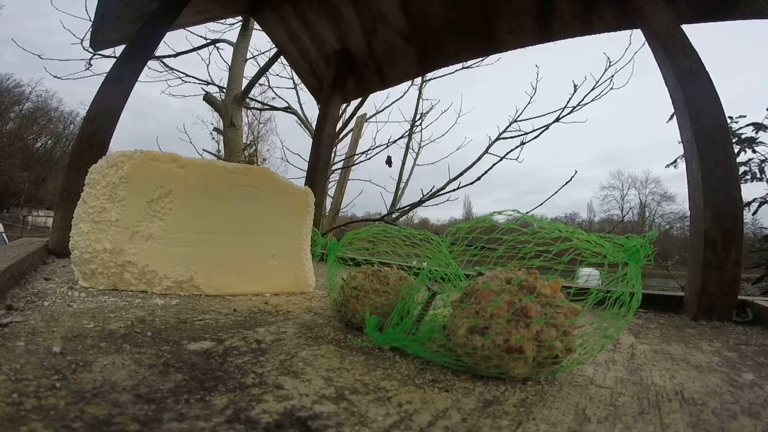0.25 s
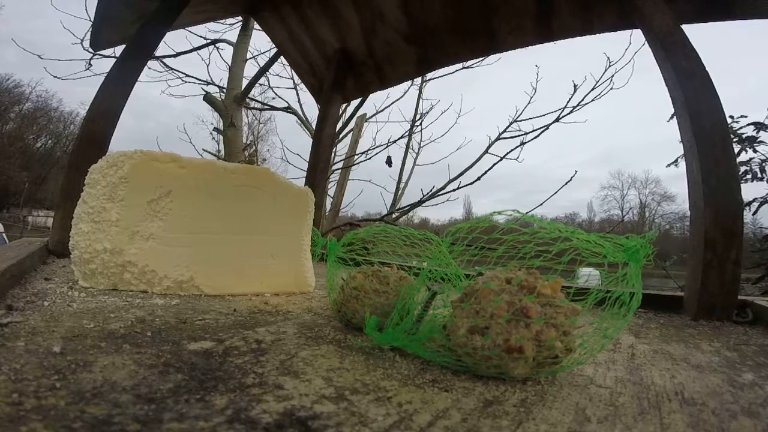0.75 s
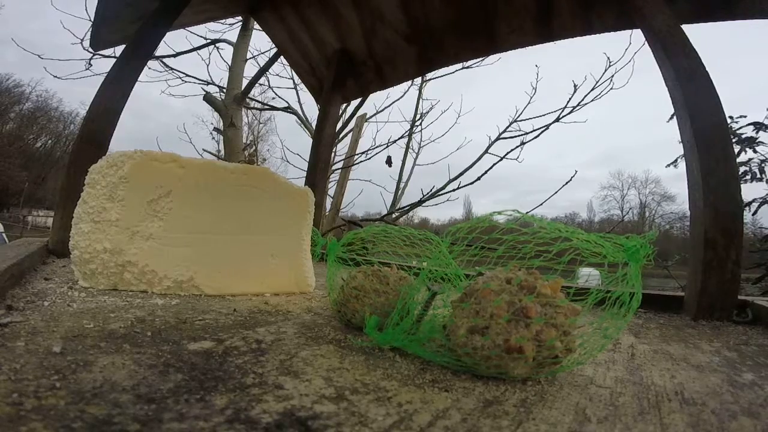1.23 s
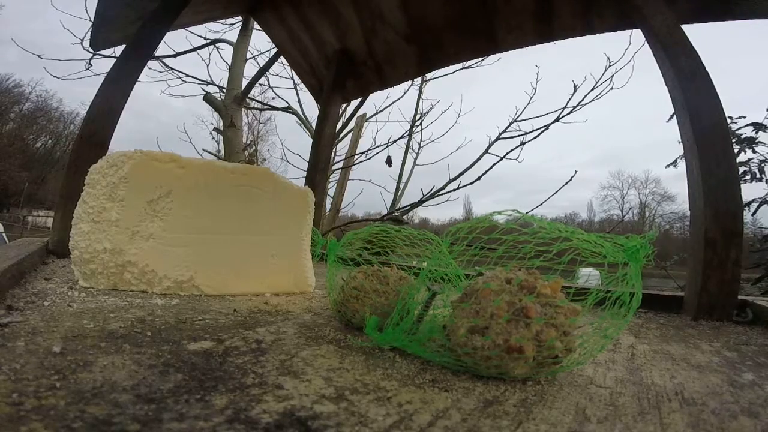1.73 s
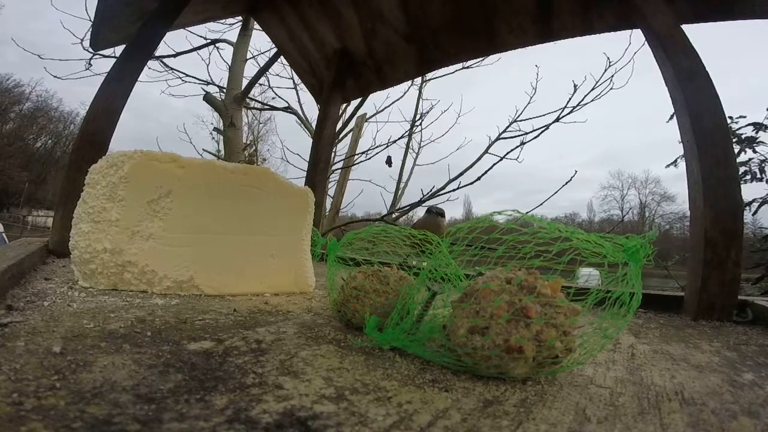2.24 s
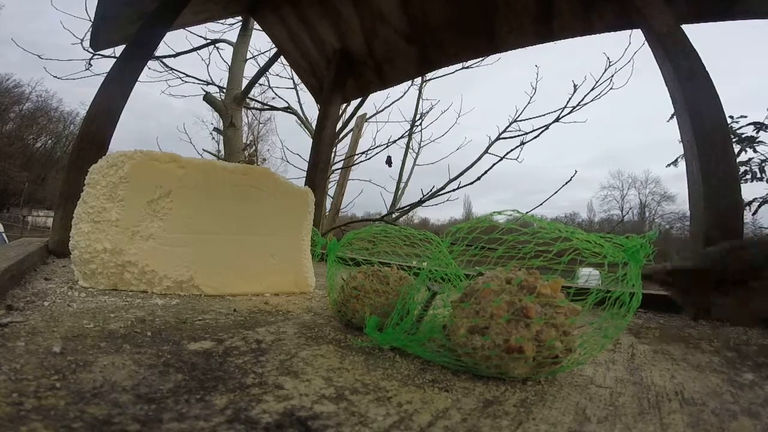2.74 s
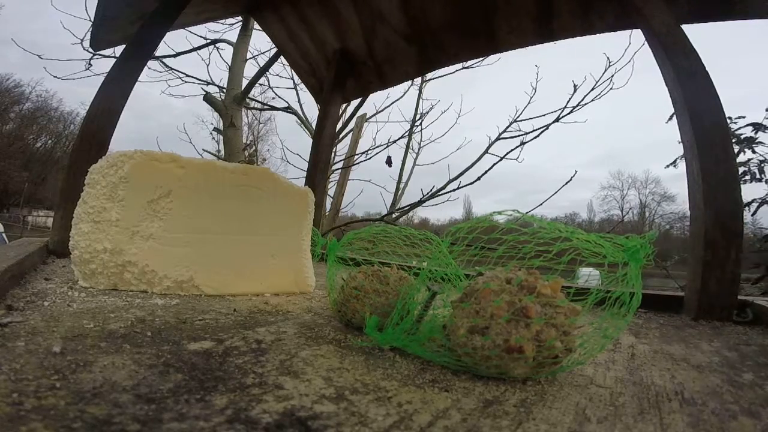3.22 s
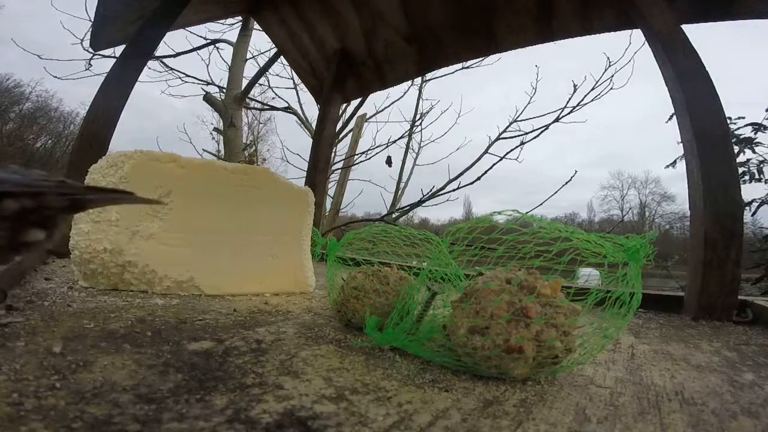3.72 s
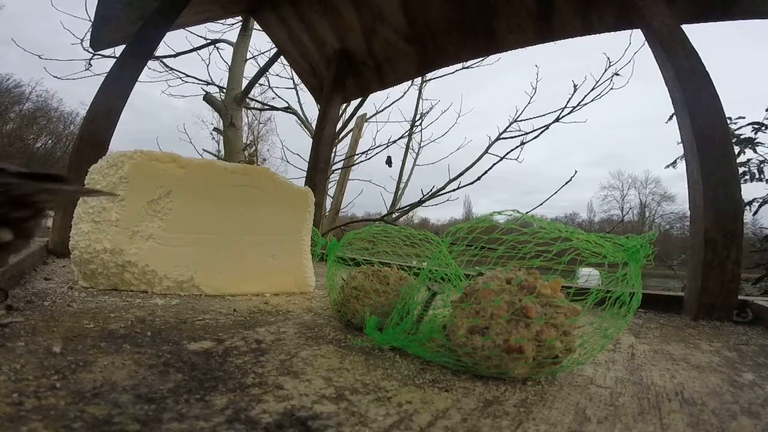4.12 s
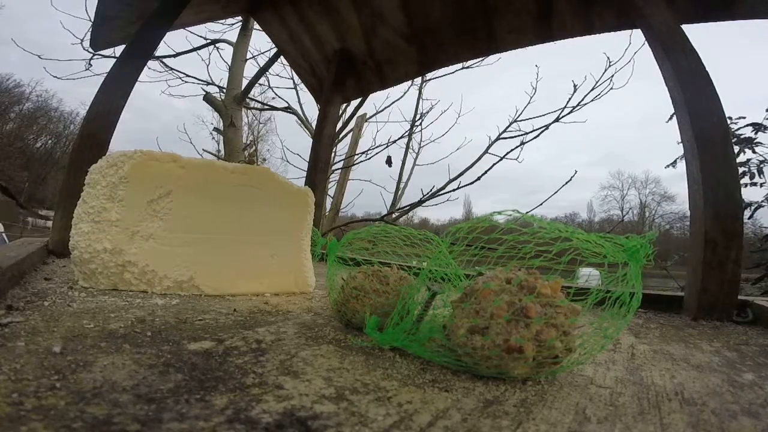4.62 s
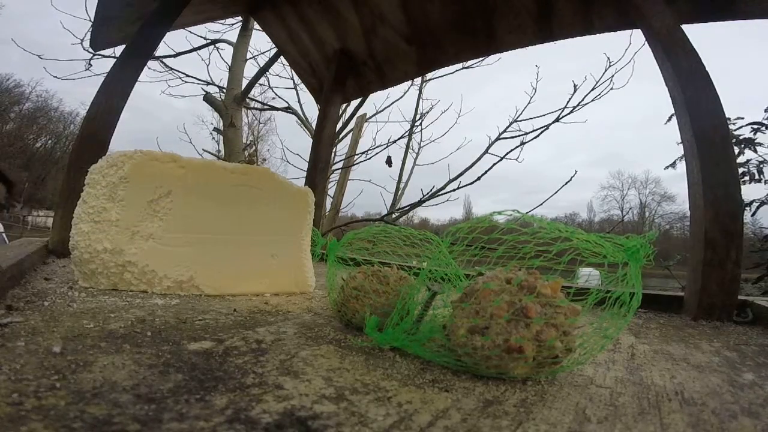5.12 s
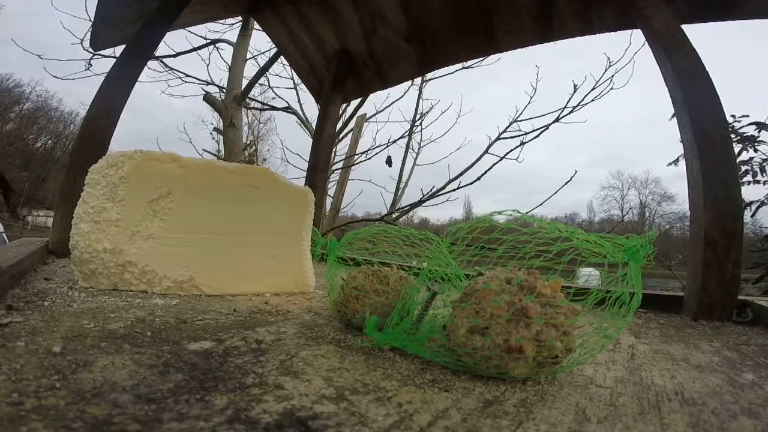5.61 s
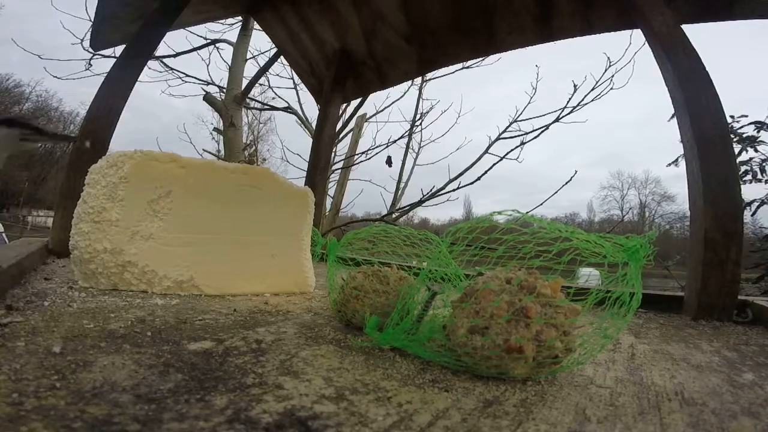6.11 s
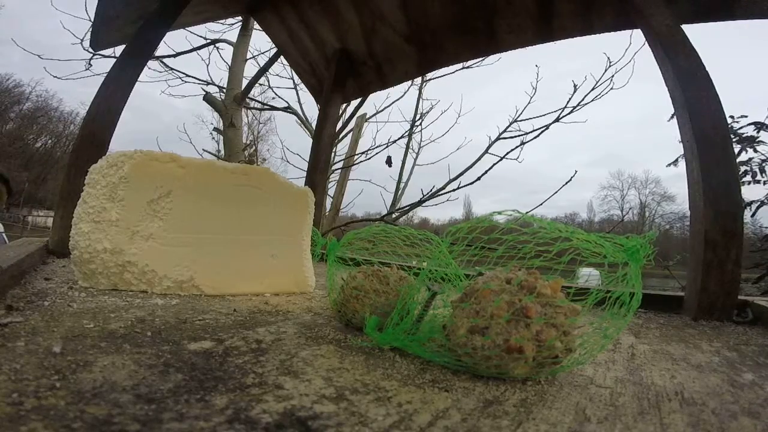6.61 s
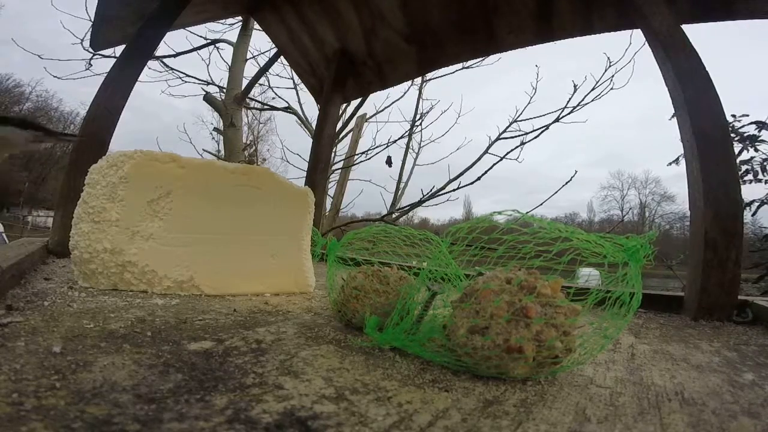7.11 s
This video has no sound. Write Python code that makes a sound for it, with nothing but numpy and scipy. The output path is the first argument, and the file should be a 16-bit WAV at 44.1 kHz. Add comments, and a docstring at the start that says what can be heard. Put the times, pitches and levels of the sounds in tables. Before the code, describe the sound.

Irregular claw taps and faint scrapes on a wooden board, two thin chirps early on, then sharp double-knock pecks in a quiet garden.

```python
"""A quiet garden with a roofed wooden feeder table, on which a bird lands, hops across and pecks hard four times.
A camera stands on the same board, so each blow of claw or beak excites damped modes: a dry knock of the board,
woody overtones and a short rattle of the case. Dragged claws scuff by irregular catches.
The table rocks in slow modes and its post trembles as deep noise after each push.
Two thin chirps are gliding tones; the garden behind is faint coloured noise."""
import sys
import numpy as np
from scipy import signal
from scipy.fft import rfft, irfft, next_fast_len
from scipy.io import wavfile
from scipy.ndimage import map_coordinates

SR = 44100
rng = np.random.default_rng(int(sys.argv[2]) if len(sys.argv) > 2 else 0)


def master_out(mix):
    """Clip the mix to full scale and print it as 16-bit PCM to the path in sys.argv[1]."""
    frames = np.transpose(np.atleast_2d(mix))
    ceiling = np.clip(frames, -1, 1)
    pcm = np.round(ceiling * 32767).astype(np.int16)
    wavfile.write(sys.argv[1], SR, pcm)


N = 324135  # length of the scene [samples]
T = np.arange(SR // 2) / SR  # time within one blow [s]

# Blows of the beak: t/s, knock level/dB, wood level/dB, rattle level/dB, click level/dB,
# rebound delay/s, rebound level/dB (relative to the bite), post tremble level/dB
PECKS = [(4.895, -24.5, -36, -27.5, -35, .017, -43, -45.5),
         (5.8372, -14.5, -30, -34, -61, 0.017, -5.5, -44.5), (6.0365, -9, -21.5, -24, -37, .02, -8.5, -46),
         (6.877, -9, -20.5, -22.5, -34, .0212, -6.5, -45.5)]
# Claws striking the board: t/s, rattle level/dB, knock level/dB, wood level/dB
STEPS = [(0.7114, -31.5, -33.5, -27.5), (0.7241, -30, -37.5, -23), (0.7348, -39, -37.5, -35),
         (0.7506, -43, -50, -55), (0.7623, -42, -42.5, -44), (1.5654, -29, -47, -34.5),
         (1.6192, -28.5, -43.5, -40), (1.6298, -37, -39, -46), (1.9923, -44, -56, -44),
         (2.0332, -44, -46, -45), (2.0826, -34.5, -48.5, -41), (2.0898, -36, -63, -40.5),
         (2.115, -39, -51.5, -53), (2.654, -39, -36, -33), (2.7393, -44, -63, -58),
         (2.763, -41.5, -52, -43.5), (2.8652, -30, -37, -32), (2.9146, -39, -44.5, -47),
         (3.2357, -56, -42.5, -46), (3.2906, -35.5, -42, -32.5), (3.3099, -29.5, -65, -40.5),
         (3.5057, -23, -28, -23.5), (3.5487, -40.5, -50, -54), (3.5979, -34, -37, -34),
         (3.6205, -40, -32.5, -31), (3.6332, -39, -42, -56), (3.654, -38.5, -46, -46),
         (3.93, -44.5, -60, -45), (4.4199, -35.5, -37, -44), (4.4258, -41, -42, -32),
         (4.4381, -41, -45, -52), (4.4555, -40, -50, -38), (4.5151, -36, -34, -38), (4.529, -41, -46, -39),
         (4.8459, -50, -46, -43), (5.791, -47.5, -57, -52), (5.8294, -43.5, -60, -45.5),
         (5.9903, -42.5, -57, -51.5), (6.316, -47.5, -77, -62), (6.97, -46, -45.5, -51)]
# The bird's weight on a new spot: t/s, post tremble level/dB, board note favoured there f/Hz
HOPS = [(.72, -40.5, 427), (1.6, -50, 410), (2.07, -52.5, 388), (2.64, -52, 370), (2.86, -45, 353),
        (3.27, -58, 347), (3.5, -51, 265), (3.6, -58, 385), (4.41, -54, 413), (4.51, -50, 251)]
# Claws dragging over the wood: t/s, duration/s, level/dB
SCUFFS = [(.72, .04, -60), (0.762, 0.025, -48.5), (1.52, 0.012, -54.5), (1.633, 0.03, -56.5),
          (1.971, 0.11, -63.5), (2.541, 0.094, -58.5), (2.641, 0.048, -55.5), (2.705, 0.076, -59.5),
          (2.867, 0.09, -62), (3.056, .018, -57.5), (3.206, 0.061, -62), (3.338, .12, -62),
          (3.631, 0.046, -51), (3.925, 0.023, -60.5), (4.345, 0.049, -61.5), (4.468, 0.033, -60.5),
          (4.857, 0.029, -57), (6.168, 0.15, -72)]
# Modes of the table with the camera on it: f/Hz, relative level/dB, t60/s (before extra damping)
TABLE_MODES = [(222.1, -10, 0.19), (308.7, 5.5, 0.069), (372.8, 1, 0.071), (421, -9, 0.089),
               (524, -11, 0.032), (584, -21, 0.098), (922.7, 3, 0.093), (1088, -18, 0.067),
               (1098, -5.5, 0.075), (1283, 1, 0.056), (1688, 3, 0.033), (1850, -16, 0.0055),
               (2170, 3.5, 0.0066), (2444, 1, 0.024), (2567, 14, 0.011), (2710, 4, 0.022),
               (3100, -33, 0.04), (3100, -32, 0.022), (4070, -23, 0.033)]
# Spectrum of the timber's crowded weak overtones: f/Hz, relative level/dB
GRAIN_SPECTRUM = [(300, 2.5), (480, 15), (660, 6.5), (790, -24.5), (1000, 10.5), (1800, 1), (2800, -3.5),
                  (3300, -11.5), (4500, -33.5), (7000, -57.5)]
# Spectrum of the case's crowded weak overtones: f/Hz, relative level/dB
CASE_SPECTRUM = [(1500, -44), (2200, 6.5), (2900, 10.5), (3400, -11.5), (4200, -2.5), (5000, -26.5),
                 (8000, -41.5)]
# Spectrum of a hard tip's snap: f/Hz, relative level/dB
CLICK_SPECTRUM = [(1500, -69), (3500, 13), (4800, 0), (6300, 3), (8500, -2), (12000, -16), (16000, -13.5)]
# Slow modes of the table on its post: f/Hz, relative level/dB, t60/s
ROCKING_MODES = [(34.1, -7, 0.84), (50.6, 0.5, 0.55), (71.6, 7, 0.25), (107, 2, 0.16)]
# Spectrum of the post's tremble: f/Hz, relative level/dB
POST_SPECTRUM = [(10, -40), (22, 0), (33, 3), (48, -21), (60, -7), (74, -9), (95, -18.5), (150, -20.5),
                 (230, -30.5), (450, -84.5)]
# Starts of the two chirps: t/s, level/dB
CHIRPS = [(.221, -57), (0.637, -47.5)]
# Course of one chirp: t/s from its start, f/Hz, relative level/dB
CHIRP_COURSE = [(0, 5700, -22), (.005, 6600, -15), (.010, 7800, -6.5), (.015, 8400, -22), (.02, 8400, -17),
                (.027, 7700, -45)]
# Spectrum of the garden air: f/Hz, relative level/dB
GARDEN_SPECTRUM = [(18, -21), (30, 4), (81, -2), (113, -1.5), (143, -5.5), (200, -2), (216, -4), (312, -5),
                   (364, -5.5), (662, -10), (1000, -12), (1410, -13.5), (2990, -18), (3680, -19),
                   (15000, -36.5)]

BITE_S = 0.0035  # from the beak's first touch until its tip bites
TOUCH_LEAD_S, TOUCH_DB, TOUCH_CLICK_DB = 0.0035, -8.5, -4.5  # a claw's graze before the foot comes down
CLICK_DB, CLICK_GROWS = -10.5, 1.124  # claw snap: dB offset; dB per dB of mean rattle and wood level
RATTLE_HZ, RATTLE_SPREAD_HZ, RATTLE_SCATTER_HZ = 2550, 850, 200  # centre, half width, +- change per step
TREMBLE_RISE_S, TREMBLE_FALL_DB_PER_S = 0.004, 24.5  # the post after a push
FIDGET_DB = -60.5  # steady tremble from the first hop onward
GARDEN_DB = -59.5
TOP_HZ = 15050  # upper band limit of the camera


def pecks(buzz_fade_s=0.014):
    """Impact and rebound: the beak thumps the board; the case rattles at touch, bite and rebound."""
    out = np.zeros(N)
    for s, knock_db, wood_db, rattle_db, click_db, rebound_s, rebound_db, _ in PECKS:
        knock, _, _ = table(spot_db=1.3, damping=0.83, centre_hz=329, focus_db=21.5)
        add(out, s, amp(knock_db) * crest(knock))
        for delay, db in [(0, -7), (BITE_S, 0), (rebound_s, rebound_db)]:
            _, wood, rattle = table(spot_db=1.5, damping=0.57, centre_hz=330, grain_db=4.0)
            buzz = amp(wood_db) * crest(wood)
            buzz = buzz + amp(rattle_db) * gritty(rattle, grit=0.008, slip_s=0.00058)
            add(out, s + delay, amp(db) * buzz * np.exp(-T / buzz_fade_s))
        for delay, db in [(BITE_S, 0), (rebound_s, rebound_db / 2)]:
            snap = band(click(t60=0.0086), 2500, 7500)
            snap = band(snap, 2500, 7500)  # twice, for steeper skirts
            add(out, s + delay, amp(click_db + db) * snap)
    return out


def steps():
    """Contact sharpness: claws graze, then knock the board and buzz the case; sharper blows snap more."""
    out = np.zeros(N)
    hop_s, _, board_hz = np.transpose(HOPS)
    for s, rattle_db, knock_db, wood_db in STEPS:
        nearest_hop = np.argmin(np.abs(hop_s - s))
        knock, wood, rattle = table(spot_db=1.5, damping=0.85, centre_hz=board_hz[nearest_hop],
                                    focus_db=40, grain_db=3.0, grain_t60=0.033,
                                    buzz_t60=0.014, low_hz=179)
        rattle_hz = RATTLE_HZ + RATTLE_SCATTER_HZ * rng.uniform(-1, 1)
        rattle = band(rattle, rattle_hz - RATTLE_SPREAD_HZ, rattle_hz + RATTLE_SPREAD_HZ)
        # the foot comes down
        add(out, s, amp(knock_db) * gritty(knock, grit=0.052, slip_s=0.0064))
        add(out, s, amp(wood_db) * gritty(wood, grit=0.018, slip_s=0.0041))
        add(out, s, amp(rattle_db) * gritty(rattle, grit=0.055, slip_s=0.0019))
        sharp_db = (rattle_db + wood_db) / 2
        snap_db = CLICK_DB + CLICK_GROWS * sharp_db
        add(out, s, amp(snap_db) * click(t60=0.012))
        # the graze just before it
        touch_s = s - TOUCH_LEAD_S
        touch_db = TOUCH_DB + (sharp_db + knock_db) / 2
        add(out, touch_s, amp(touch_db) * gritty(wood + rattle, grit=0.18, slip_s=0.0037))
        add(out, touch_s, amp(TOUCH_CLICK_DB + snap_db) * click(t60=0.0087))
    return out


def table(spot_db, damping, centre_hz, focus_db=14, grain_db=0, grain_t60=0.047,
          buzz_db=-7, buzz_t60=0.022, low_hz=215, high_hz=900):
    """Modal superposition: one blow's board knock, woody overtones and case rattle."""
    hz, db, t60 = np.transpose(TABLE_MODES)
    register = np.digitize(hz, [750, 2000])  # 0 knock, 1 wood, 2 rattle
    # each blow weights the modes anew
    weight = amp(db + spot_db * rng.standard_normal(len(hz)))
    # the spot favours board modes near its centre
    octaves_away = np.minimum(np.abs(np.log2(hz / centre_hz)), 0.5)
    # neighbours swing in opposite senses, so the knock swells
    board = amp(-focus_db * octaves_away) * (-1) ** np.arange(len(hz))
    modes = ringing(hz, weight * np.where(register == 0, board, 1), t60 / damping)
    knock, wood, rattle = [unit(modes[register == k].sum(axis=0)) for k in range(3)]
    # a small board radiates little bass
    knock = unit(band(knock, low_hz, high_hz))
    # overtones too crowded to tell apart die away like noise
    grain = noise(GRAIN_SPECTRUM, size=len(T)) * amp(-60 * damping * T / grain_t60)
    wood = wood + amp(grain_db) * unit(grain)
    buzz = noise(CASE_SPECTRUM, size=len(T)) * amp(-60 * damping * T / buzz_t60)
    rattle = rattle + amp(buzz_db) * unit(buzz)
    rise = swell(0.0004)
    return knock, rise * wood, rise * rattle


def ringing(hz, weight, t60):
    """Free vibration: one exponentially damped sine per mode."""
    decay = amp(-60 * T / t60[:, None])
    return weight[:, None] * decay * np.sin(2 * np.pi * hz[:, None] * T)


def gritty(ring, grit, slip_s):
    """Stick-slip excitation: a ring of peak 1 driven by a first touch and the tiny catches after it."""
    t = T[:SR // 20]
    force = grit * rng.standard_normal(len(t)) ** 3 * np.exp(-t / slip_s)
    force[0] += 1
    return crest(signal.fftconvolve(ring, force)[:len(T)])


def click(t60):
    """Hard contact: a short broadband burst of peak 1, the bright snap of a tip."""
    return crest(noise(CLICK_SPECTRUM, size=len(T)) * amp(-60 * T / t60) * swell(0.001))


def swell(rise_s):
    """Finite contact time: the response takes a moment to build up from 0 to 1."""
    return 1 - np.exp(-(T / rise_s) ** 2)


def rocking(peck_db=-21, step_db=-14):
    """Low-order modes: every peck and footfall sets the whole table rocking; dB relative to the knock."""
    out = np.zeros(N)
    hz, db, t60 = np.transpose(ROCKING_MODES)
    pushes = [(s, knock_db + peck_db) for s, knock_db, *_ in PECKS]
    pushes += [(s, knock_db + step_db) for s, _, knock_db, _ in STEPS]
    for s, push_db in pushes:
        weight = amp(db + 0.71 * rng.standard_normal(len(hz))) * (-1) ** np.arange(len(hz))
        rock = swell(0.0054) * ringing(hz, weight, t60).sum(axis=0)
        add(out, s, amp(push_db) * crest(rock))
    return out


def scuffs(wood_db=1, knock_db=-8):
    """Friction: dragged claws catch on the grain at random, each catch ringing the table."""
    out = np.zeros(N)
    for s, length_s, db in SCUFFS:
        n = max(int(length_s * SR), 64)
        # some 600 catches a second on average
        catches = (rng.random(len(T)) < 600 / SR) * rng.standard_normal(len(T))
        knock, wood, rattle = table(spot_db=2.5, damping=0.95, centre_hz=400)
        ring = rattle + amp(wood_db) * unit(wood) + amp(knock_db) * knock
        scrape = signal.fftconvolve(catches[:n] * signal.windows.tukey(n), ring)
        add(out, s, amp(db) * scrape / (np.std(scrape[:n]) + 1e-9))
    return out


def sway(lumps_db=1.5):
    """Addition of powers: each push leaves a lumpy, dying rumble in the post; fidgeting keeps it alive."""
    t = np.arange(N) / SR
    pushes = [(s, db) for s, db, _ in HOPS] + [(s, db) for s, *_, db in PECKS]
    power = amp(FIDGET_DB) ** 2 * (t > HOPS[0][0])
    for s, db in pushes:
        age = np.maximum(t - s, 0)
        rise = 1 - np.exp(-age / TREMBLE_RISE_S)
        power = power + (amp(db - TREMBLE_FALL_DB_PER_S * age) * rise) ** 2
    lumps = amp(lumps_db * wobble(rate=14))
    return np.sqrt(power) * unit(lumps * noise(POST_SPECTRUM, size=N))


def chirps():
    """Frequency modulation: a small bird in the trees gives two thin, mostly rising notes."""
    out = np.zeros(N)
    s, hz, db = np.transpose(CHIRP_COURSE)
    t = T[T < s[-1]]
    phase = 2 * np.pi * np.cumsum(np.interp(t, s, hz)) / SR
    note = amp(np.interp(t, s, db)) * np.sin(phase)
    for start, level_db in CHIRPS:
        add(out, start, amp(level_db) * note)
    return out


def garden():
    """Stationary noise: faint outdoor air and hiss, drifting only slightly in level."""
    drift_db = 0.5 * wobble(rate=1.5)
    return amp(GARDEN_DB + drift_db) * noise(GARDEN_SPECTRUM, size=N)


def noise(spectrum, size):
    """Spectral shaping: white noise filtered to a table of f/Hz and level/dB, at rms 1."""
    hz, db = np.transpose(spectrum)
    m = next_fast_len(size + 8192)
    gain = amp(np.interp(np.log(np.fft.rfftfreq(m, 1 / SR) + 1), np.log(hz), db))
    return unit(irfft(rfft(rng.standard_normal(m)) * gain, m)[:size])


def wobble(rate):
    """Slow random modulation: a smooth curve through rate random knots a second."""
    knots = rng.standard_normal(int(N * rate / SR) + 4)
    return map_coordinates(knots, [np.arange(N) * rate / SR])


def band(x, low_hz, high_hz):
    """Band-pass filtering: keep mainly what lies between two frequencies."""
    return signal.sosfilt(signal.butter(2, [low_hz, high_hz], "band", fs=SR, output="sos"), x)


def amp(db):
    """Logarithmic level: decibels to amplitude ratio."""
    return 10 ** (np.asarray(db) / 20)


def unit(x):
    """Effective value: scale to rms 1."""
    return x / np.sqrt(np.mean(x ** 2) + 1e-20)


def crest(x):
    """Peak value: scale to peak 1."""
    return x / (np.abs(x).max() + 1e-20)


def add(track, s, x):
    """Superposition: mix x into the track at time s."""
    part = track[max(round(s * SR), 0):][:len(x)]
    part += x[:len(part)]


def scene():
    """Linear superposition: all sources sum at one microphone."""
    bird_on_table = pecks() + steps() + rocking() + scuffs() + sway()
    return (bird_on_table + chirps() + garden())[None]


def record(dry):
    """Band limitation: the camera keeps nothing from its upper band limit upward."""
    m = next_fast_len(N + SR // 2)
    passed = np.fft.rfftfreq(m, 1 / SR) < TOP_HZ
    return irfft(rfft(dry, m) * passed, m)[:, :N]


dry = scene()
out = record(dry)
master_out(out)
```